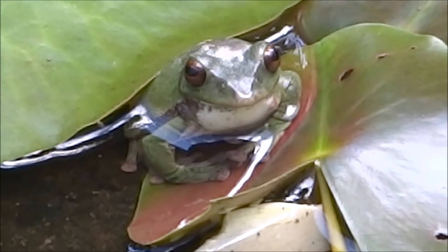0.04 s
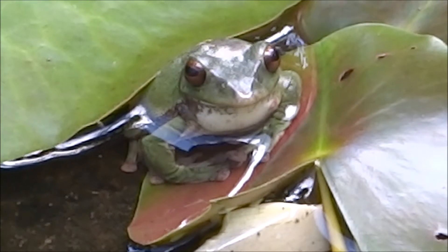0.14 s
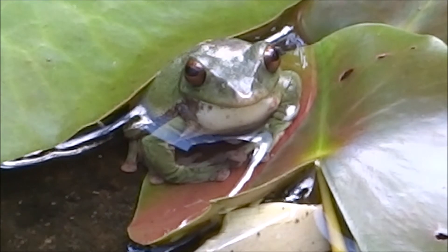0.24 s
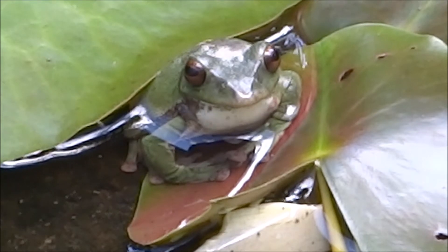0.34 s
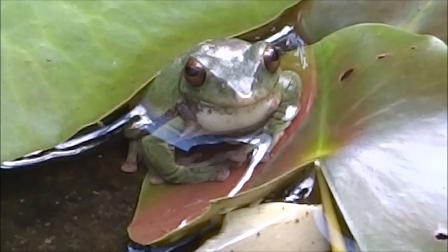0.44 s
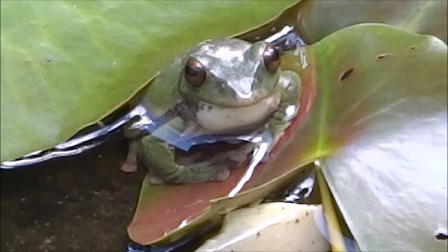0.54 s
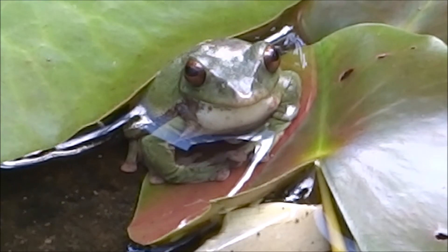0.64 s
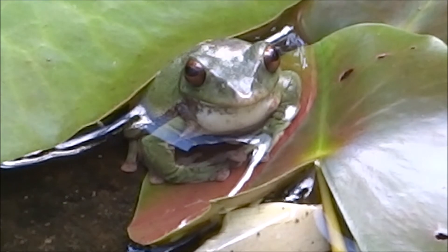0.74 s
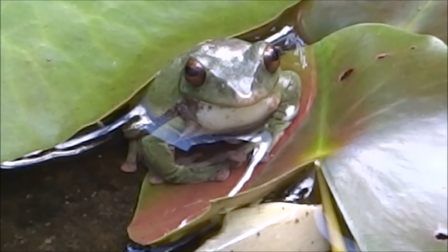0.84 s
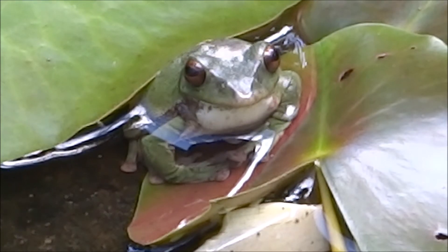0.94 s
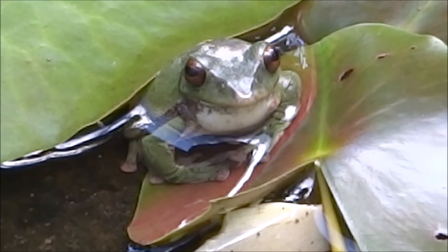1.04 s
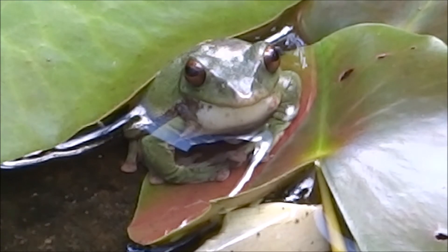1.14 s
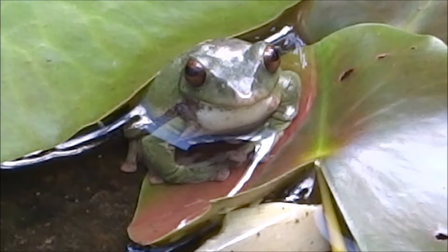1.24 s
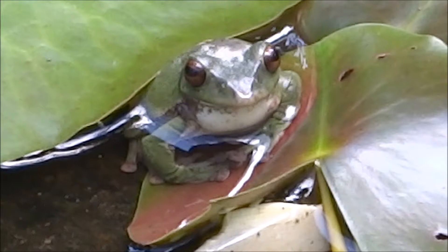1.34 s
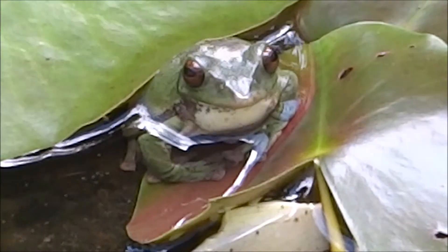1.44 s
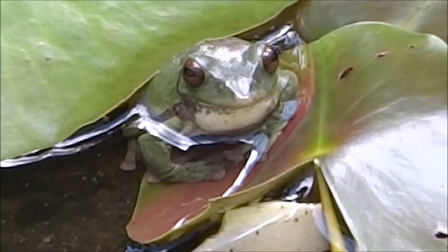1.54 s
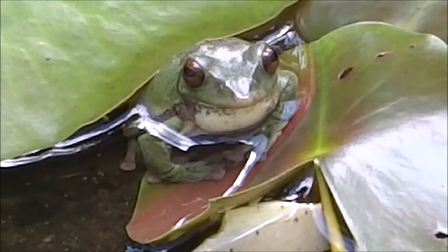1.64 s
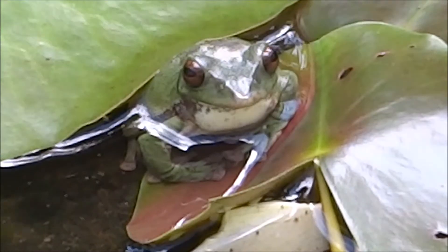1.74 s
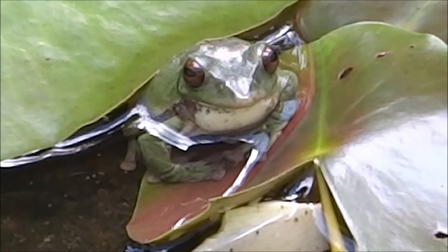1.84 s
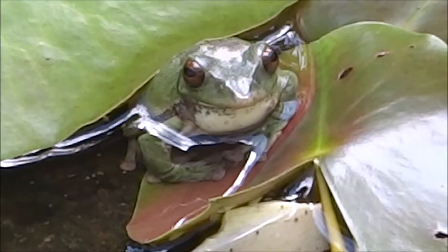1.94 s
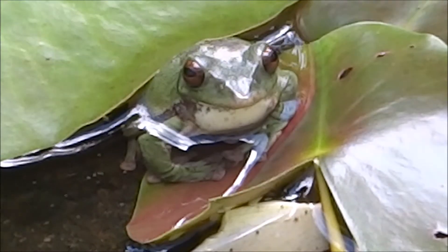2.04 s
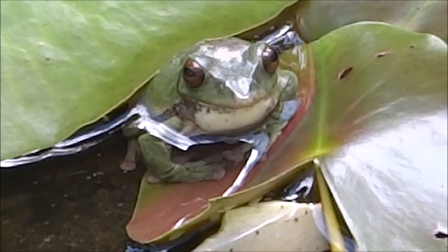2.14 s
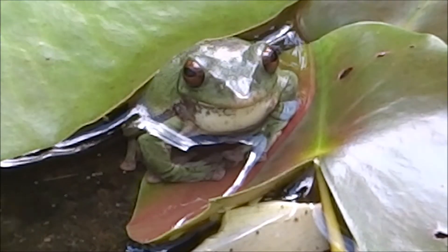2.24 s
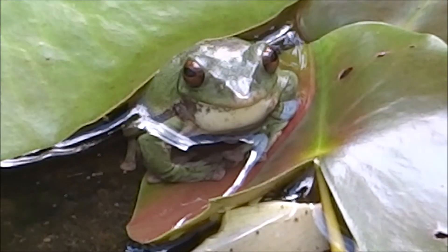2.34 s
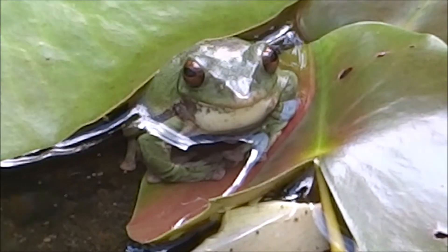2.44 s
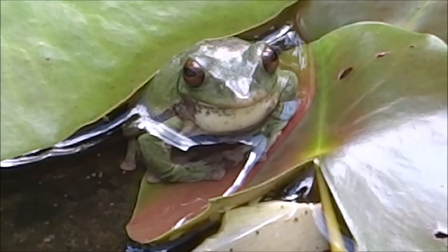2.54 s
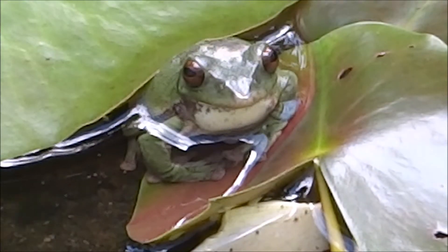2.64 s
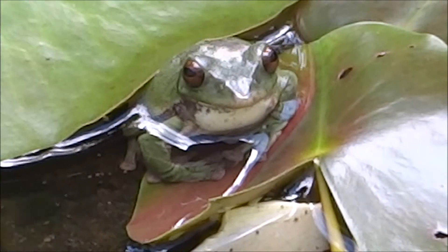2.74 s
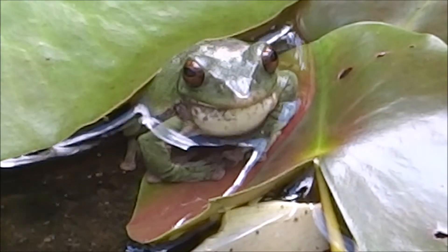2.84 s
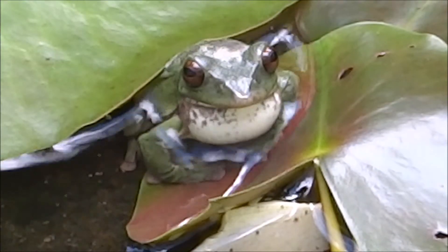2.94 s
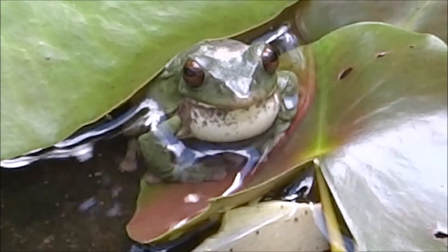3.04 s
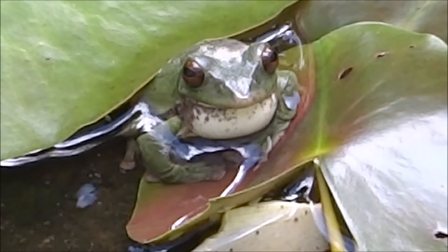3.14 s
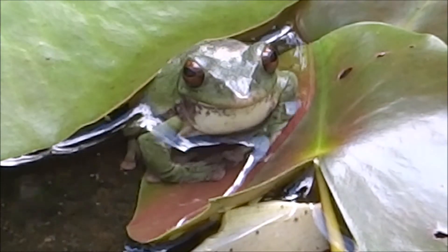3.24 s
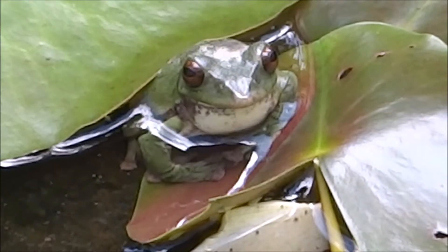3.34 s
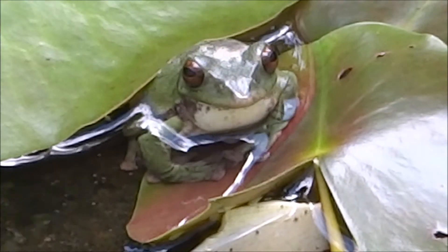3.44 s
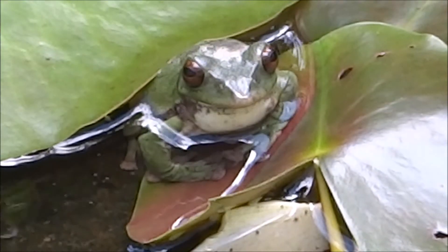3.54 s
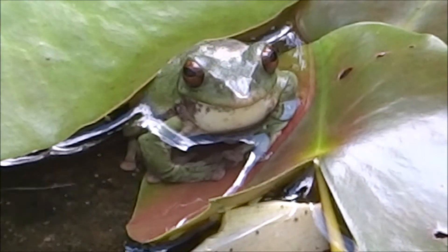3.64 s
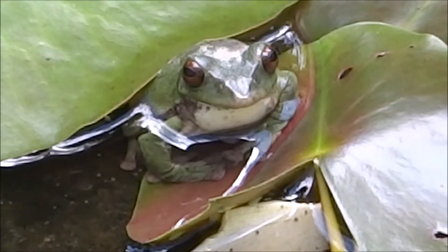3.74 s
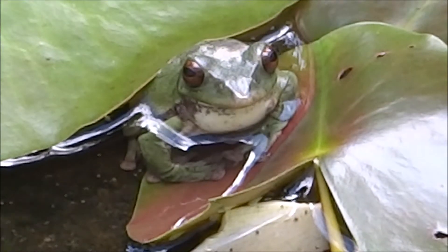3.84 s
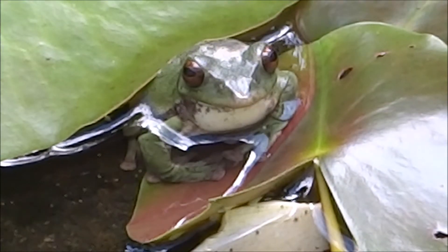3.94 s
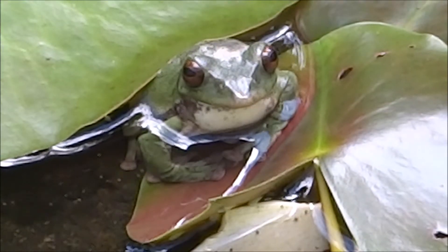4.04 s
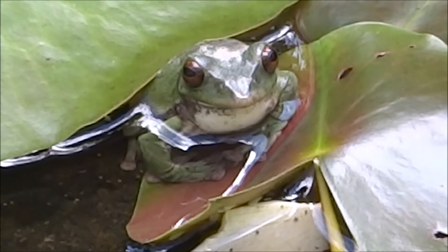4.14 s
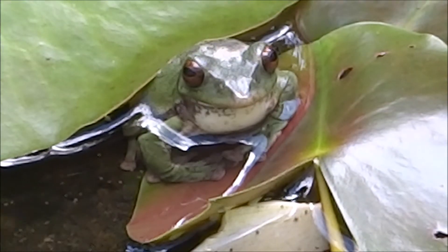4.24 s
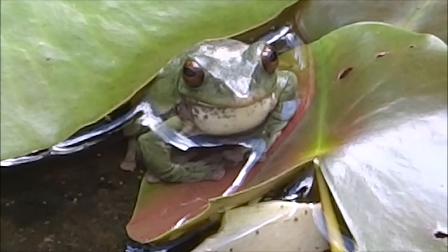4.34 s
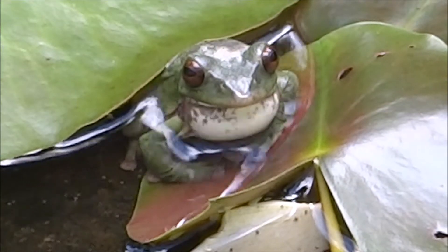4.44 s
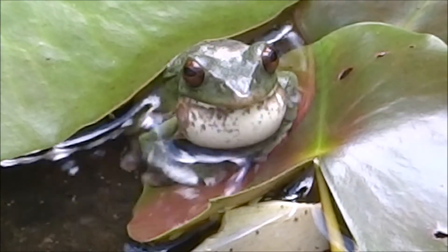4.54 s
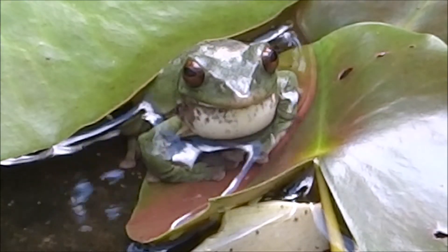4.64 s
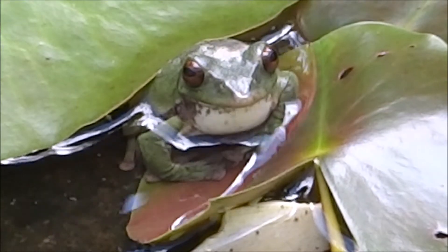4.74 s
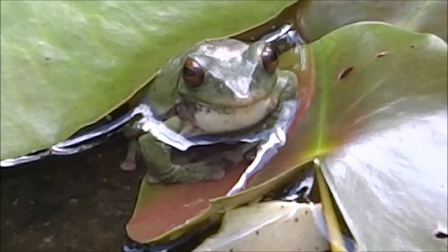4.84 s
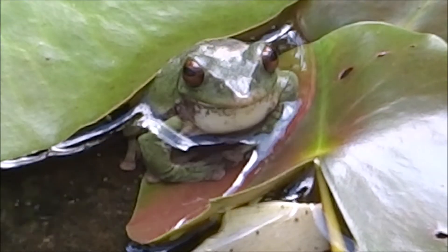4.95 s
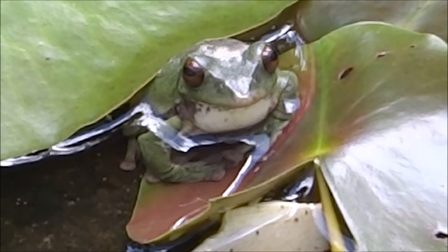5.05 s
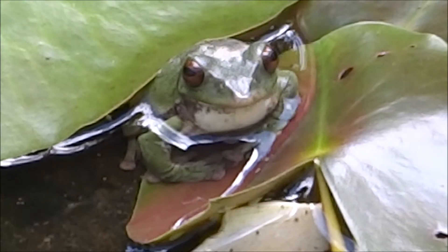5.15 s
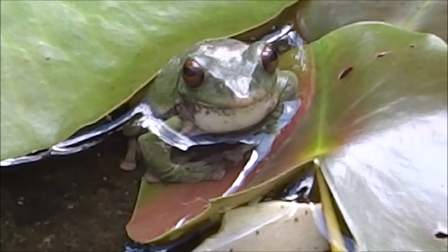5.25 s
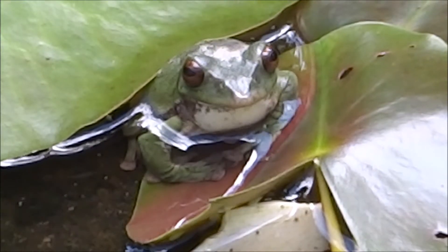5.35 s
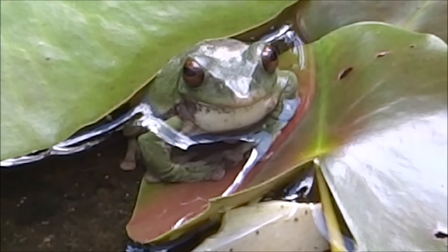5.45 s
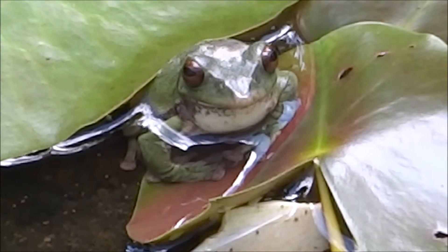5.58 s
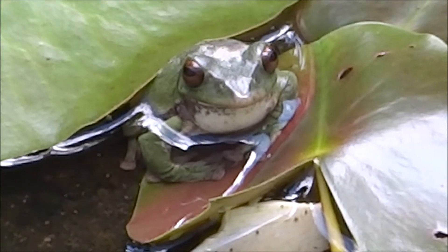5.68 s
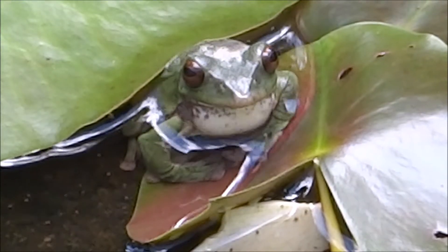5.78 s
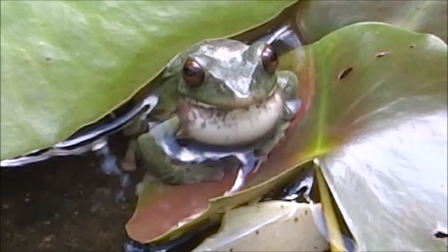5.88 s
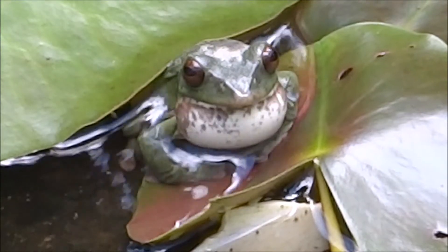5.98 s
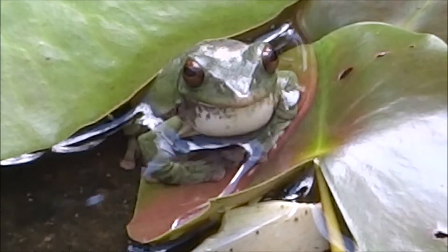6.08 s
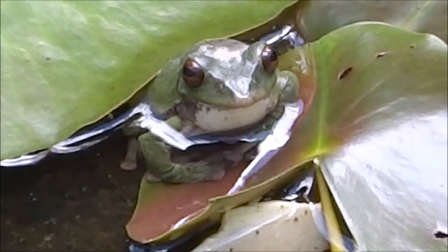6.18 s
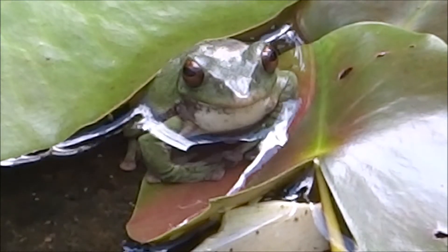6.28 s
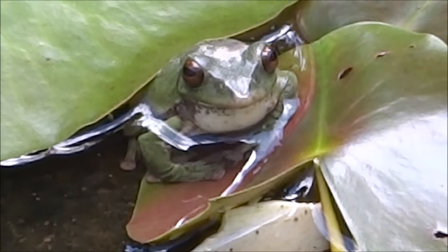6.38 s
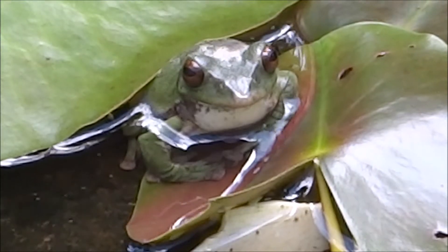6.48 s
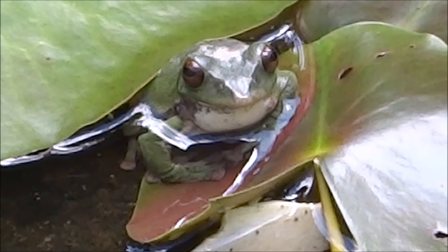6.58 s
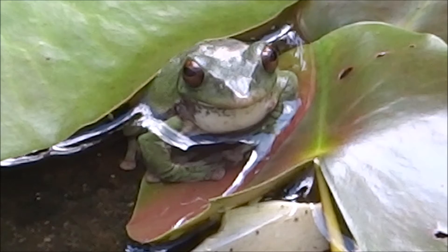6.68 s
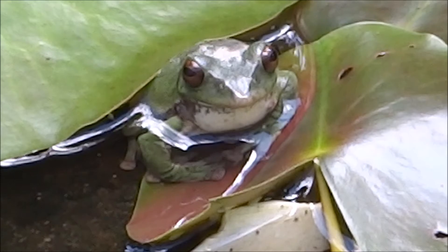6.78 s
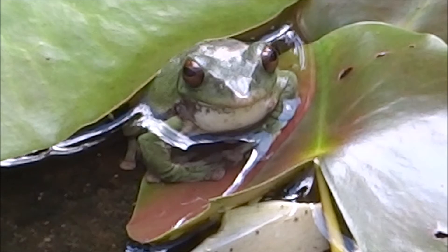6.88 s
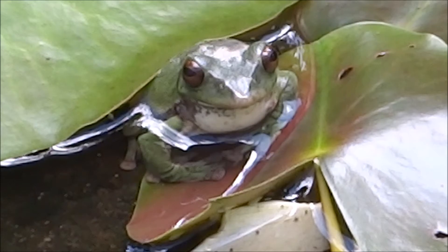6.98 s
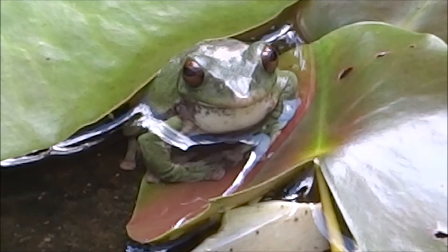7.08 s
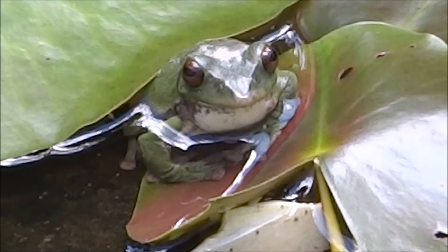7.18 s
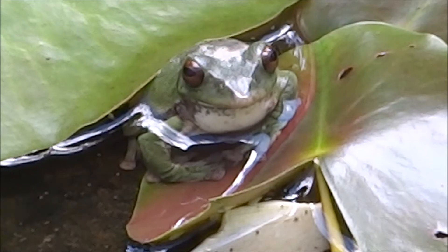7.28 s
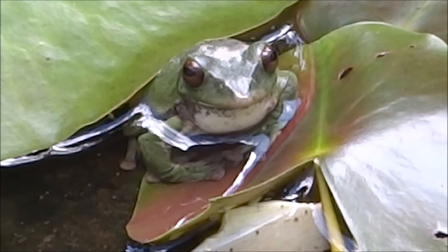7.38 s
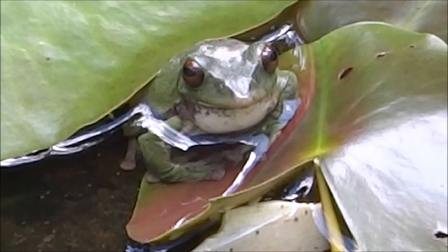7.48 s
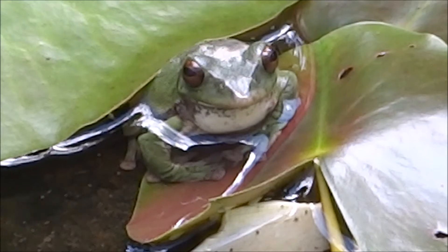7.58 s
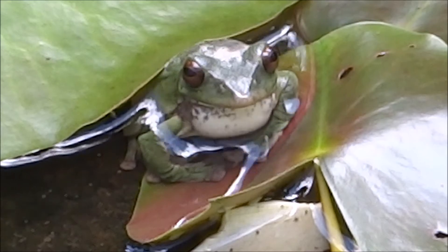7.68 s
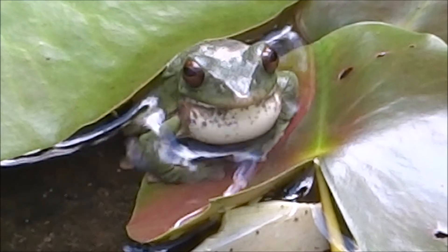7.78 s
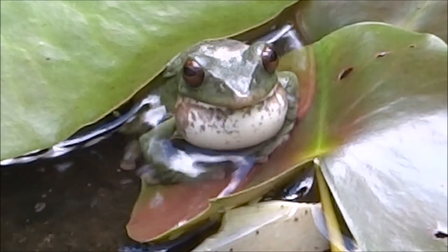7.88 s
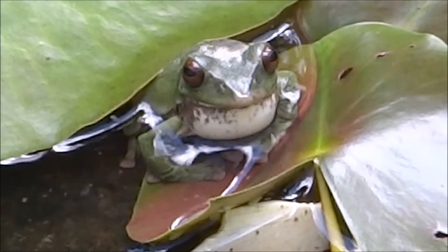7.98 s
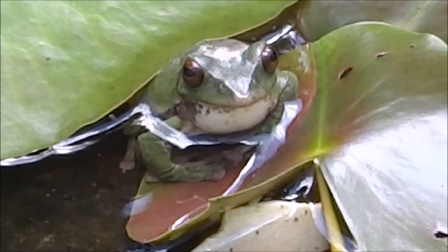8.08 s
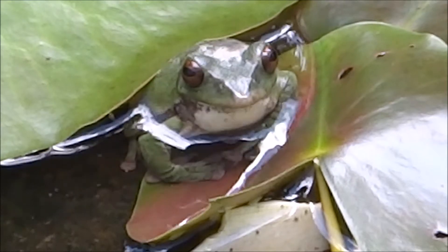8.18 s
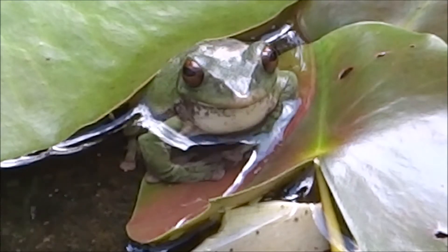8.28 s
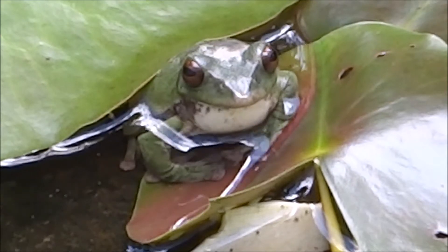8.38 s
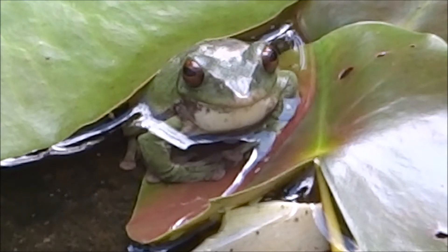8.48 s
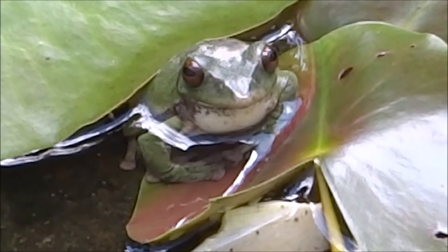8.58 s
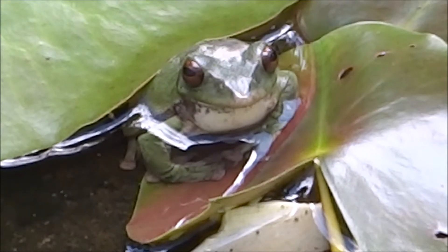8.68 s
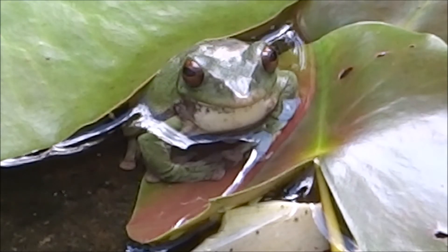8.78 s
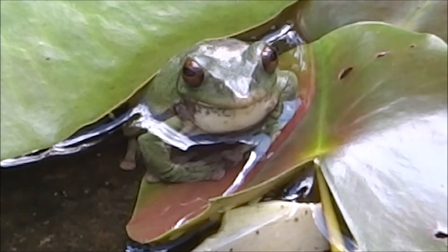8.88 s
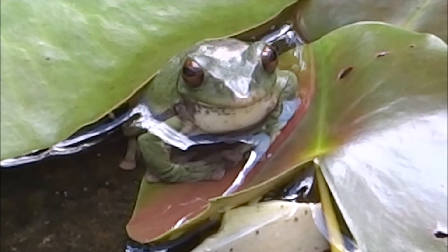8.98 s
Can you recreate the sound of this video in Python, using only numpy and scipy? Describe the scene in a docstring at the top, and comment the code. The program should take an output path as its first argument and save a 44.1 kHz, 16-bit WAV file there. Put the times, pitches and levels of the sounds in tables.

```python
"""Over a soft garden wash, small birds chirp at a distance; early on, air buffets the microphone.
From 3 s a bird gives three slow whistles, and a tree frog on a close lily pad begins four croaks of two
to four knocking pulses. Each pulse is a few swings of its vocal cords, coloured by the throat and echoed
by the leaves and the garden. A tiny splash follows the third croak; then a bird holds a whistle and ends
it in whip cracks, before the frog croaks once more."""
import sys
import numpy as np
from scipy import signal
from scipy.fft import rfft, irfft
from scipy.io import wavfile

SR = 44100
rng = np.random.default_rng(int(sys.argv[2]) if len(sys.argv) > 2 else 0)


def put_to_file(sound):
    """Save the sound as 16-bit audio at rate SR, in the file named by the first command-line argument."""
    columns = np.atleast_2d(sound).T  # one column per channel
    safe = np.clip(columns, -1, 1)
    whole_steps = np.round(safe * 32767)
    wavfile.write(sys.argv[1], SR, whole_steps.astype(np.int16))


N = 397782
TIME = np.arange(N) / SR


def undb(db):
    """Decibels to amplitude ratio."""
    return 10 ** (np.asarray(db) / 20)


def unit(x):
    """Normalisation to rms 1."""
    return x / np.sqrt(np.mean(x ** 2))


def at_hz(points, hz):
    """Interpolation of (frequency [Hz], value) points on a log-frequency axis."""
    f, value = np.transpose(points)
    return np.interp(np.log(np.maximum(hz, 1)), np.log(f), value)


def add(out, s, x):
    """Superposition: x is added to out from time s on."""
    i = int(round(s * SR))
    x, i = x[max(-i, 0):], max(i, 0)
    out[i:i + len(x)] += x[:N - i]


def butter(x, kind, hz, order):
    """Butterworth filter: low-, high- or band-pass."""
    return signal.sosfilt(signal.butter(order, hz, kind, fs=SR, output="sos"), x + 1e-18)


def noise(spectrum, correlation):
    """Partial coherence: mid and side noise sum to a stereo field of rms 1."""
    hz = np.arange(N // 2 + 1) * SR / N
    mid, side = rfft(rng.standard_normal((2, N))) * undb(at_hz(spectrum, hz))
    c = at_hz(correlation, hz)
    return unit(irfft(mid * np.sqrt(1 + c) + np.array([[1], [-1]]) * side * np.sqrt(1 - c), N))


def scatter(x, t60, onset_s, width):
    """Diffuse reverberation: a stereo tail from foliage and fences builds up, then decays."""
    t = TIME[:SR]
    mid, side = rng.standard_normal((2, SR)) * undb(-60 * t / t60) * (1 - np.exp(-t / onset_s))
    tail = (mid + width * np.array([[1], [-1]]) * side) / np.sqrt(np.sum(mid ** 2) * (1 + width ** 2))
    return signal.fftconvolve(x[None], tail, axes=1)[:, :N]


def echoes(x, table):
    """Specular reflection: hard surfaces return delayed, weaker copies."""
    out = np.zeros(N)
    for delay, db in table:
        add(out, delay, undb(db) * x)
    return out


def note(contour, buzz=0., buzz_hz=185, waver=0.0028, edge_s=0.003):
    """Frequency modulation: a tone on a (time [s], pitch [Hz], level [dB]) contour wavers or trills."""
    s, hz, db = np.transpose(contour)
    t = s[0] + TIME[:int((s[-1] - s[0]) * SR)]
    drift = np.interp(t - s[0], np.linspace(0, 1, 100), rng.standard_normal(100))
    pitch = np.interp(t, s, hz) * (1 + waver * drift + buzz * np.sin(2 * np.pi * buzz_hz * t))
    fade = np.clip(np.minimum(t - t[0], t[-1] - t) / edge_s, 0, 1)
    return fade * undb(np.interp(t, s, db)) * np.sin(2 * np.pi * np.cumsum(pitch) / SR)


def slur(length, from_hz, to_hz, bend, crest, start_db, end_db):
    """Exponential glide contour, late if bend > 0, early if < 0; loudest at the fraction crest."""
    u = np.linspace(0, 1, 40)
    hz = from_hz + (to_hz - from_hz) * np.expm1(bend * u) / np.expm1(bend)
    return np.column_stack([u * length, hz, np.interp(u, [0, crest, 1], [start_db, 0, end_db])])


# spectrum of the wash: (frequency [Hz], relative density [dB])
WASH_SPECTRUM = [(20, -55), (60, -27), (150, -22), (250, -14), (360, -7.5), (600, -2.5), (850, -2),
                 (980, -1), (1590, -7.5), (2000, -8.5), (3600, -13.5), (4700, -17), (6500, -20.5),
                 (11300, -23), (15500, -27)]
# its coherence: (frequency [Hz], left-right correlation [-1..1])
WASH_CORRELATION = [(100, 0.4), (290, -0.028), (640, -0.15), (1400, -0.21), (3100, 0.064), (6800, 0.53),
                    (13000, 0.95)]
# its envelope: (time [s], level [dB])
WASH_LEVEL = [(0, -54.5), (1.4, -54), (1.6, -53), (4, -53.5), (7.6, -53.5), (8.2, -55), (9, -53.5)]
# faint high tones: (frequency [Hz], level [dB])
WHINE_TONES = [(11569, -89), (11628, -83.5)]
def background(sway_db=0.1):
    """Ambient noise: a broadband outdoor wash, with narrow bands heard as a faint whine."""
    sway = np.interp(TIME, np.linspace(0, TIME[-1], 60), rng.standard_normal(60))
    level = undb(np.interp(TIME, *np.transpose(WASH_LEVEL)) + sway_db * sway)
    whine = sum(undb(db) * unit(butter(rng.standard_normal(N), "band", [hz - 5, hz + 5], order=1))
                for hz, db in WHINE_TONES)
    return level * noise(WASH_SPECTRUM, WASH_CORRELATION) + whine


# the thin tsee note: (time [s], pitch [Hz], relative level [dB])
TSEE_CONTOUR = [(0, 5900, -10.5), (.015, 6450, -1), (.04, 6800, -4.5), (.055, 6650, -4.5),
                (.066, 6150, -15), (.078, 6550, 0.5), (.09, 6750, -15)]
# the tuwee, a lisp, a dip and two upslurs:
# (delay [s], duration [s], start pitch [Hz], end pitch [Hz], relative level [dB])
TUWEE_GLIDES = [(.005, .015, 5070, 5660, -10.5), (0.026, 0.014, 3750, 3500, -11),
                (.036, .065, 3497, 4240, .5), (.11, .031, 3630, 4330, 0)]
SONG_PHRASES = [(-.024, .194, -49, -51.5, -45.5, .994), (.622, .1995, -53, -53.5, -45.5, .984),
                (1.287, 0.17, -51.5, -59, None, 1.01), (4.165, 0.19, -58, -56.5, -45, 1.01),
                (4.805, 0.2, -52, -51.5, -46.5, 1.01), (5.465, .1965, -51, -47.5, -47.5, .99),
                (6.115, .199, -46.5, -46.5, -43, .99), (6.787, .2032, -56.5, -55.5, -42.5, 1.015),
                (7.506, 0.22, -53.5, -53.5, -45, .985)]
def songs():
    """Fast frequency modulation makes a small bird's two tsees buzz; a tuwee may take the third beat."""
    tsee, tuwee = np.zeros((2, N))
    for s, beat, first_db, second_db, tuwee_db, ratio in SONG_PHRASES:
        for k, db in enumerate([first_db, second_db]):
            add(tsee, s + k * beat, undb(db) * note(np.array(TSEE_CONTOUR) * [1, ratio, 1], buzz=0.031))
        if tuwee_db is not None:
            for delay, length, from_hz, to_hz, db in TUWEE_GLIDES:
                contour = slur(length, ratio * from_hz, ratio * to_hz,
                               bend=3.22, crest=0.68, start_db=-7.5, end_db=-3.5)
                add(tuwee, s + 2 * beat + delay, undb(tuwee_db + db) * note(contour, waver=0.0063))
    return tsee, tuwee


# a rising note: (time [s], pitch [Hz], relative level [dB])
SWEEP_CONTOUR = [(0, 4000, -9), (.03, 4500, 0.5), (.05, 5000, -0.5), (.07, 5400, -5), (.095, 5650, -7)]
# bouts of it: (time [s], notes [count], first note's gain [dB], later notes' gain [dB])
SWEEP_BOUTS = [(.256, 3, -56.5, -59.5), (2.295, 4, -67, -60), (5.151, 2, -65, -64), (8.63, 1, -60, -59.5)]
def sweeps(beat_s=.47):
    """Frequency sweep: a far bird repeats one rising note at a steady pace."""
    out = np.zeros(N)
    for s, notes, first_db, later_db in SWEEP_BOUTS:
        for k in range(notes):
            add(out, s + k * beat_s, undb(later_db if k else first_db) * note(SWEEP_CONTOUR, buzz=0.02))
    return out


# Gaussian puffs of air: (time [s], half-width [s], level [dB])
PUFFS = [(.785, 0.019, -45), (0.877, 0.0098, -41.5), (1, .023, -36), (1.046, 0.012, -36.5),
         (1.236, 0.021, -58), (1.308, 0.017, -60), (1.466, .01, -58), (1.501, .013, -55)]
# wind noise: (frequency [Hz], relative density [dB])
WIND_SPECTRUM = [(10, -42), (25, -17), (60, -10), (125, 0), (190, -1), (260, 0), (350, -7), (480, -17),
                 (700, -45)]
def buffets(start_s=.3, rise_s=0.56, end_s=1.54, release_s=.025, flutter_db=-68, spread_db=4):
    """Turbulent pressure: wind flutters unevenly on the microphone, with a few strong low puffs."""
    puffs = sum(undb(db) * np.exp(-((TIME - s) / half) ** 2) for s, half, db in PUFFS)
    breeze = np.clip(np.minimum((TIME - start_s) / rise_s, (end_s - TIME) / release_s), 0, 1)
    eddies = np.interp(TIME * 45, np.arange(1000), rng.standard_normal(1000))  # 45 values a second
    flutter = breeze * undb(flutter_db + spread_db * eddies)
    rumble = noise(WIND_SPECTRUM, correlation=[(40, 1.0), (90, 1.0), (170, -0.057), (330, -0.26)])
    return (puffs + flutter) * rumble


# whistles: (time [s], duration [s], start pitch [Hz], resting pitch [Hz], slide time [s], level [dB])
WHISTLE_GLIDES = [(2.976, 0.13, 3050, 3200, 0.091, -48.5), (3.29, .25, 2770, 2370, .085, -55),
                  (3.725, 0.3, 3700, 2690, .1, -57)]
def slow_whistles(attack_s=0.031, start_db=-11, end_db=-6, scoop=0.0395, scoop_s=0.0119):
    """Glissando: each whistle scoops up as it opens, slides to its resting pitch and fades a little."""
    out = np.zeros(N)
    for s, length, from_hz, to_hz, slide_s, db in WHISTLE_GLIDES:
        t = np.linspace(0, length, 40)
        slide = to_hz + (from_hz - to_hz) * np.exp(-(t / slide_s) ** 2)
        hz = slide * (1 - scoop * np.exp(-t / scoop_s))
        level = db + np.interp(t, [0, attack_s, length], [start_db, 0, end_db])
        add(out, s, note(np.column_stack([t, hz, level]), waver=.0026))
    return out


# throat response at full effort: (frequency [Hz], overtone level against the fundamental [dB])
THROAT_RESPONSE = [(1480, 1), (1750, -14), (2100, -24), (2500, -17.5), (2850, -24), (3200, -20.5),
                   (3550, -15.5), (3750, -31), (4100, -36), (4800, -36), (5600, -39), (6800, -52),
                   (9500, -45.5), (13000, -60)]
def pulse(hz, length, sag, rise_s=0.00031, sag_s=0.0051, closing=2.14, spread_db=2.5, full_hz=1190):
    """Source and filter: a puff swings the cords about five times; pitch sags as the pressure drops."""
    t = TIME[:SR // 50]
    pitch = hz * (1 - sag * np.tanh(t / sag_s))
    phase = 2 * np.pi * np.cumsum(pitch) / SR
    swing = (1 - np.exp(-(t / rise_s) ** 2)) * np.exp(-(t / length) ** closing)
    k = np.arange(2, 15)[:, None]  # harmonic numbers
    tension = hz / full_hz  # a softer pulse leaves the throat slacker, so its resonances sit lower
    throat_db = at_hz(THROAT_RESPONSE, k * pitch / tension)
    strength = undb(throat_db + spread_db * rng.standard_normal(k.shape))
    # the overtones line up into one snap a cycle, when the cords meet
    snaps = np.sum(strength * np.cos(k * (phase - np.pi / 2)), axis=0)
    return swing * (np.sin(phase) + snaps)


# croaks: (time [s], pulses [count], first gap [s], first drive level [dB], target drive level [dB],
# pulse decay time [s], base pitch sag [fraction])
PULSE_TRAINS = [(3.0042, 2, 0.053, -13.5, -16.5, .0048, 0.26), (4.493, 3, 0.044, -14.5, -6.5, 0.0046, .26),
                (5.8586, 4, 0.044, -15.1, -7, .0044, .18), (7.7835, 4, .0426, -17, -6.5, 0.0042, 0.057)]
def croaks(gap_growth=1.13, loud_db=-6.5, loud_hz=1202, hz_per_db=21, sag_per_db=0.0332, last_sag=.14):
    """Pulse trains slow down as effort nears its target; softer pulses start lower and sag further."""
    out = np.zeros(N)
    for s, pulses, gap, first_db, target_db, length, sag in PULSE_TRAINS:
        for k in range(pulses):
            db = target_db + (first_db - target_db) * 0.26 ** k
            slack_db = loud_db - db
            droop = sag + sag_per_db * slack_db
            droop += last_sag * (k == pulses - 1)  # the air runs out on the last pulse
            add(out, s, undb(db) * pulse(loud_hz - hz_per_db * slack_db, length, droop))
            s += gap * gap_growth ** k
    return out


# resonances of the hollow under the leaves: (frequency [Hz], bandwidth [Hz], gain [dB])
HOLLOW_MODES = [(892, 51, -13), (1870, 47, -4.5), (2480, 150, -6.5)]
# reflections of the frog: (delay [s], gain [dB])
FROG_REFLECTIONS = [(.0055, -15), (.0285, -31), (.0355, -27), (.0535, -25)]
def frog(pan_db=-1.1):
    """Radiation and resonance: pulses leave the vocal sac, ring among the leaves and reverberate."""
    cords = croaks()
    voice = butter(cords, "high", 720, order=5)  # a small body radiates little bass
    push = undb(-21) * butter(cords, "band", [25, 200], order=1)  # near field of the swelling sac
    ring = sum(undb(db) * butter(voice, "band", [hz - width / 2, hz + width / 2], order=1)
               for hz, width, db in HOLLOW_MODES)
    outgoing = voice + ring
    reflected = butter(outgoing, "low", 3300, order=2)  # foliage absorbs the treble
    leaves = undb(-15) * scatter(reflected, t60=.045, onset_s=.005, width=.3)
    garden = undb(-12.5) * scatter(reflected, t60=0.23, onset_s=0.025, width=0.28)
    far = undb(-28) * scatter(reflected, t60=0.78, onset_s=0.037, width=.6)
    early = echoes(butter(outgoing, "low", 1960, order=2), FROG_REFLECTIONS)
    near = outgoing + push + early + leaves
    return near * undb(np.array([[pan_db], [-pan_db]]) / 2) + garden + far


def splash(start_s=6.1045, db=-52.5, decay_s=0.042):
    """Exponentially decaying noise: a tiny splash as the frog settles after a croak."""
    out, t = np.zeros(N), TIME[:SR // 5]
    spray = butter(rng.standard_normal(len(t)), "band", [1200, 5300], order=1)
    spray = butter(spray, "band", [900, 12000], order=3)
    add(out, start_s, undb(db) * np.exp(-t / decay_s) * unit(spray))
    return out


def held_whistle(start_s=6.17, db=-46):
    """Pure tone: one long note swells on an almost steady pitch."""
    out = np.zeros(N)
    contour = slur(length=.53, from_hz=1855, to_hz=1875, bend=1.4, crest=0.77, start_db=-17.5, end_db=-7)
    add(out, start_s, undb(db) * note(contour, waver=.00055))
    return out


# whip notes: (time of the top [s], rise [s], fall [s], start pitch [Hz], top pitch [Hz], end pitch [Hz],
# level [dB], scattered against direct level [dB])
WHIP_NOTES = [(6.718, 0.027, .05, 1940, 2130, 1400, -49, 5),
              (6.857, 0.034, .032, 1860, 3110, 1850, -45, 3.5),
              (6.958, .023, .068, 3820, 4350, 2147, -40, -1.5),
              (7.07, .025, .05, 2130, 2133, 1450, -49, 5.5)]
def whip_cracks(snap_hz=598):
    """Rapid sweeps: a bird's pitch flicks up and drops; returns direct sound and the part to scatter."""
    direct, to_trees = np.zeros((2, N))
    for s, rise_s, fall_s, start_hz, top_hz, end_hz, db, scattered_db in WHIP_NOTES:
        up = slur(rise_s, start_hz, top_hz, bend=1.78, crest=0.27, start_db=-6, end_db=-7)
        snap = (end_hz - top_hz) / snap_hz  # the wider the drop, the more of it comes at once
        down = slur(fall_s, top_hz, end_hz, bend=snap, crest=0.22, start_db=-8, end_db=-10)
        contour = np.vstack([up, down[1:] + [rise_s, 0, 0]])
        crack = undb(db) * note(contour, buzz=0.015, waver=.014)
        add(direct, s - rise_s, crack)
        add(to_trees, s - rise_s, undb(scattered_db) * crack)
    return direct, to_trees


# reflections of the tuwee: (delay [s], gain [dB])
TUWEE_REFLECTIONS = [(.038, -10.5), (.058, -10.5)]
def birds():
    """Direct-to-reverberant ratio: the further off a bird sits, the more of its song arrives scattered."""
    tsee, tuwee = songs()
    sweep, whistles, held = sweeps(), slow_whistles(), held_whistle()
    whips, whips_to_trees = whip_cracks()
    direct = tsee + tuwee + held + whistles + whips + undb(-1.5) * sweep
    close = undb(-3.5) * tsee + undb(-2.5) * tuwee + undb(-5) * held + undb(-1) * whistles
    distant = undb(3.5) * sweep + whips_to_trees
    bushes = scatter(close, t60=0.5, onset_s=0.0032, width=0.36)
    trees = scatter(distant, t60=0.66, onset_s=0.0074, width=0.44)
    return direct + echoes(tuwee, TUWEE_REFLECTIONS) + bushes + trees


def scene():
    """Superposition of everything heard at the pond's edge."""
    return frog() + birds() + splash() + buffets() + background()


def record(dry, top_hz=15800):
    """Band limiting: a steep low-pass filter cuts the highest treble."""
    return signal.sosfilt(signal.ellip(10, .1, 70, top_hz, fs=SR, output="sos"), dry)


dry = scene()
out = record(dry)
put_to_file(out)
```